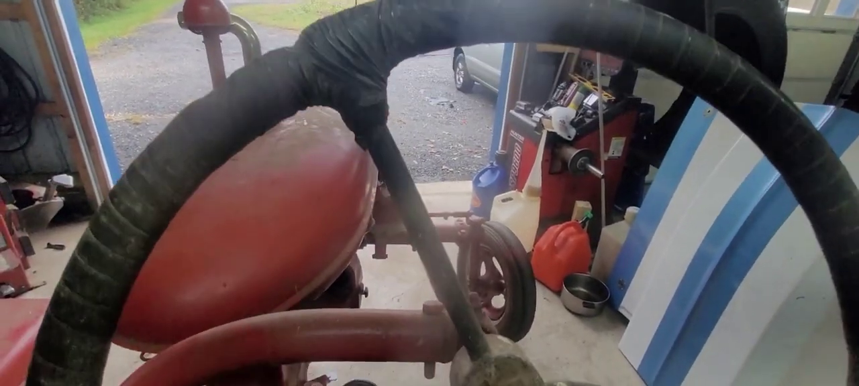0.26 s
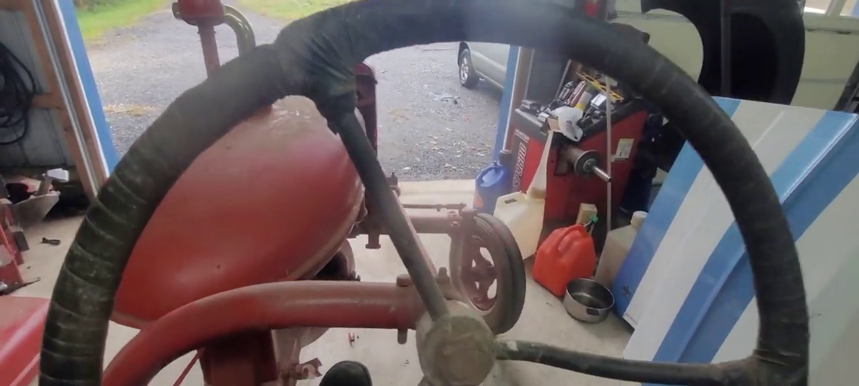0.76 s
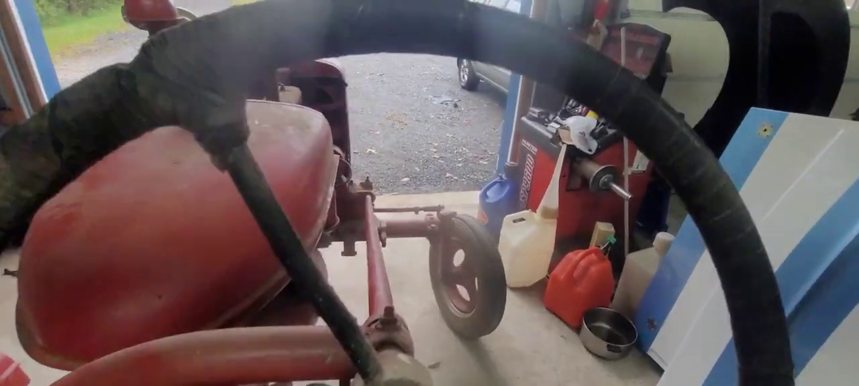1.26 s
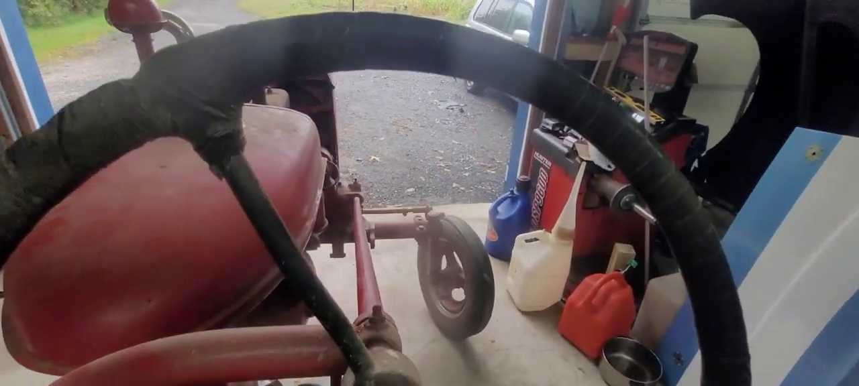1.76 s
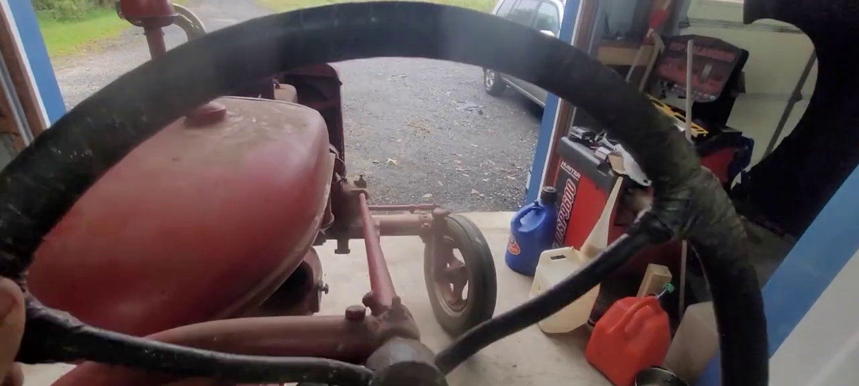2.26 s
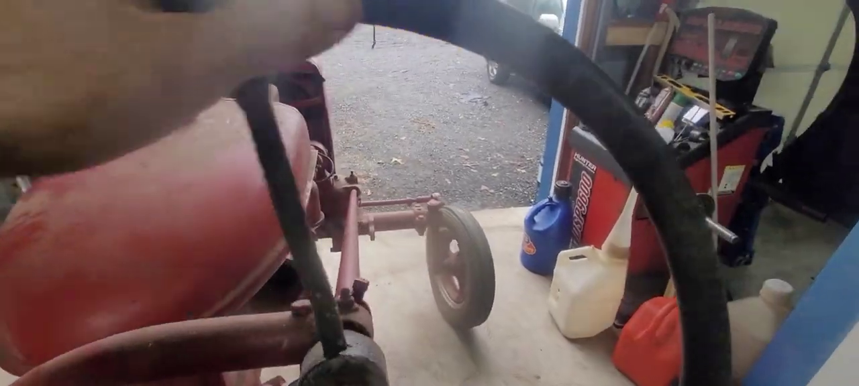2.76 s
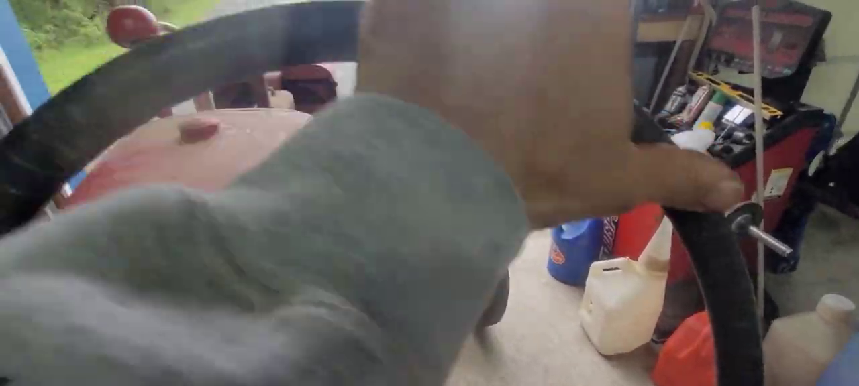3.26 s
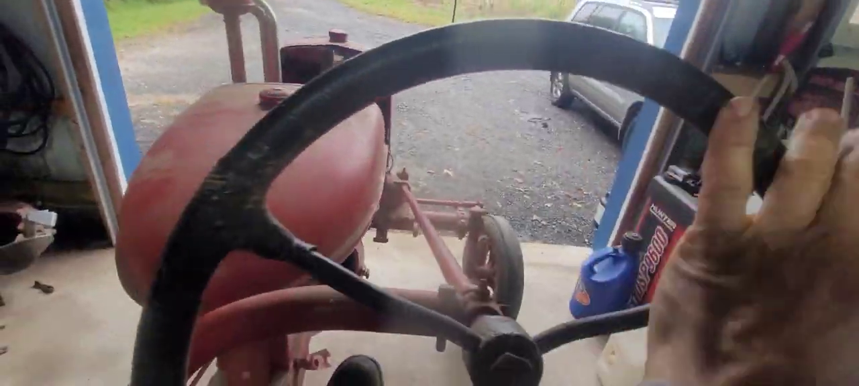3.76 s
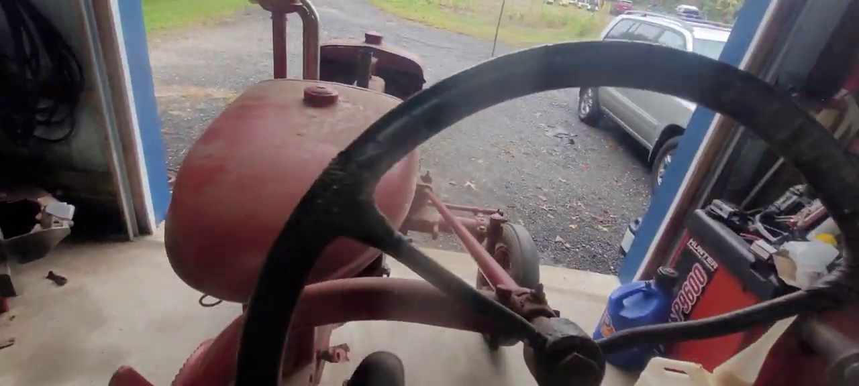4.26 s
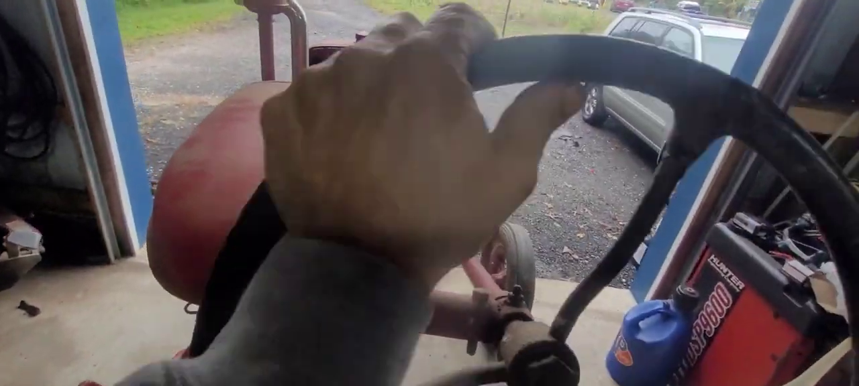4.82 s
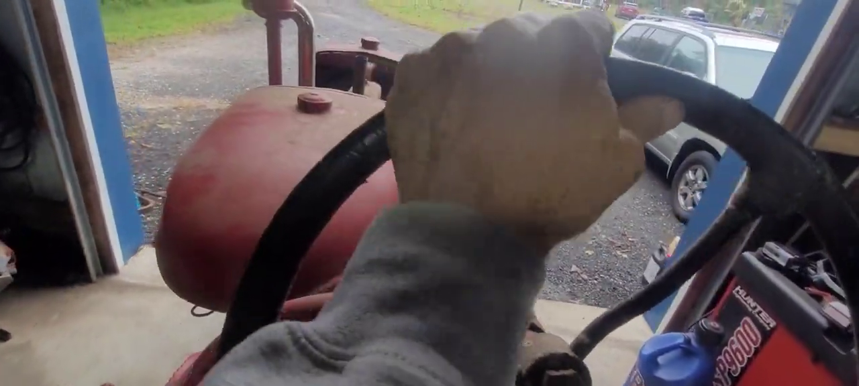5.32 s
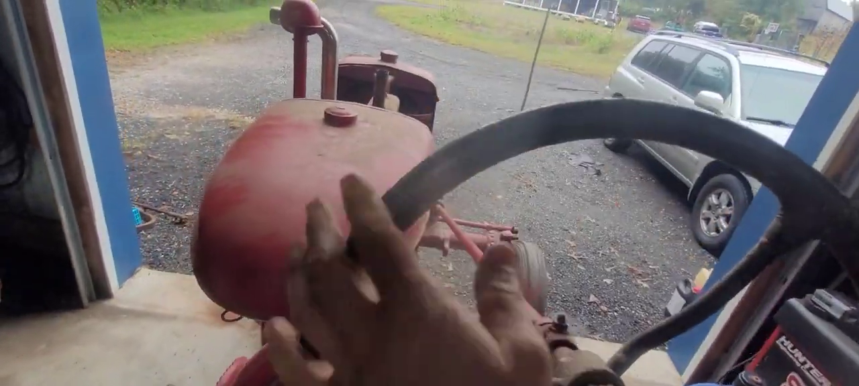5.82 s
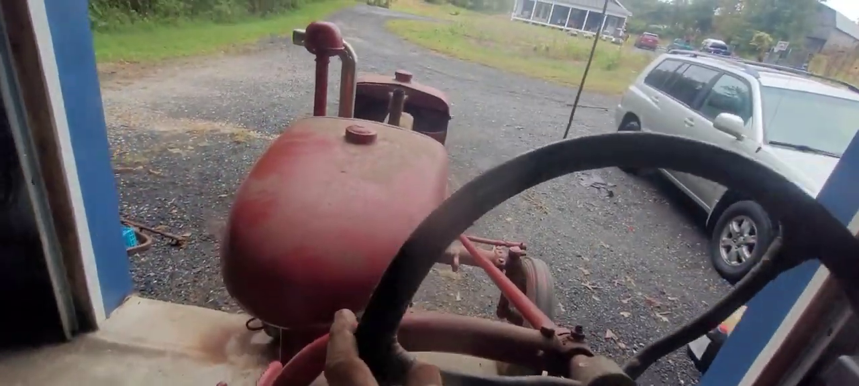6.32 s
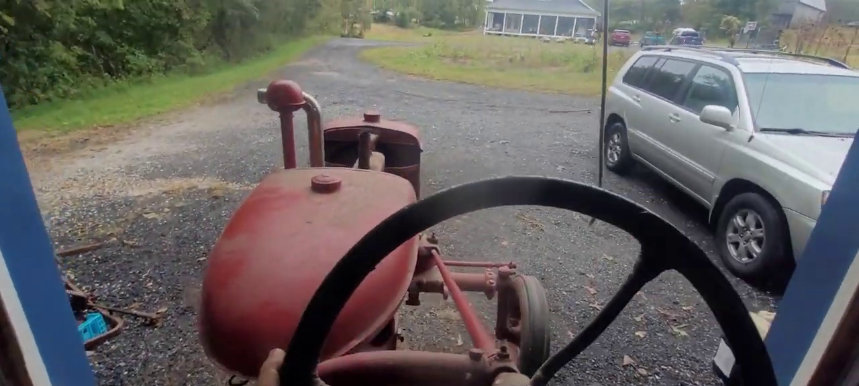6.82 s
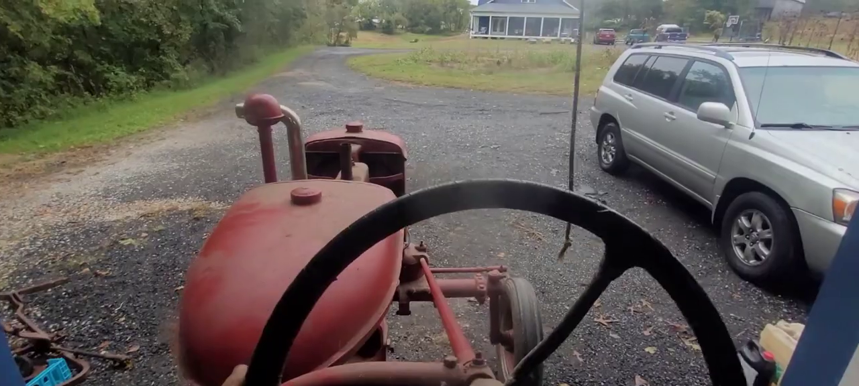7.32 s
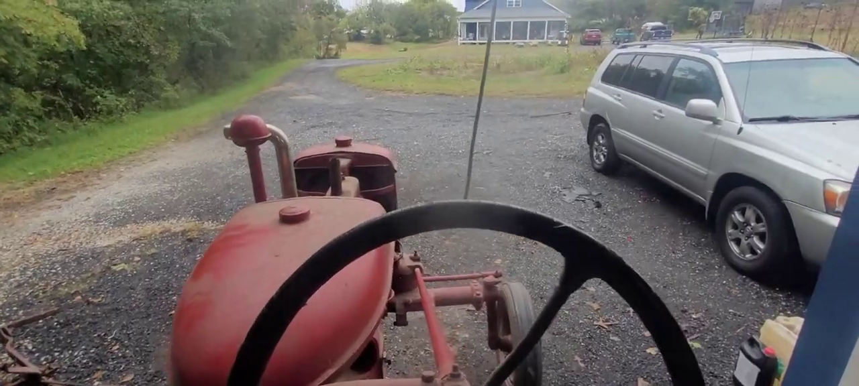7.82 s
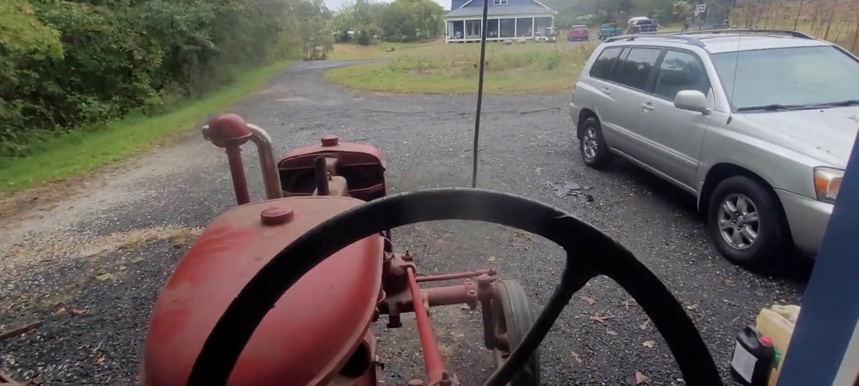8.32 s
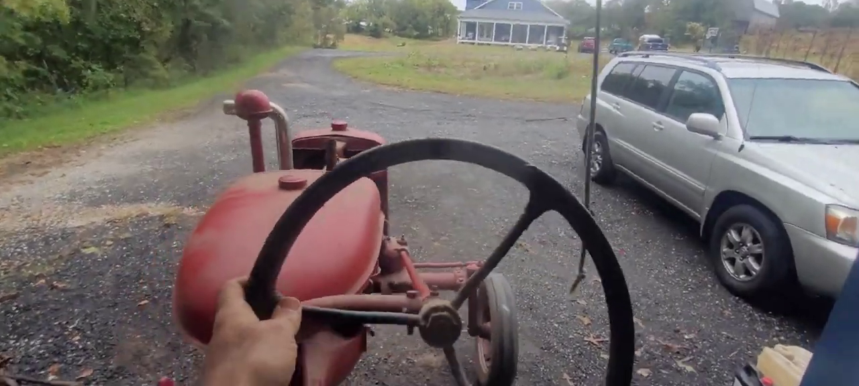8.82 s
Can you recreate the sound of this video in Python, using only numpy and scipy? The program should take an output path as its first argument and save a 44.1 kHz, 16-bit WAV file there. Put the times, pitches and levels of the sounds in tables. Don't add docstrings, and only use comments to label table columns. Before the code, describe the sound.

From the driver's seat, a low throbbing tractor exhaust with ticking valves and metallic knocks rolls along, ending in a burst of rattling and bogging.

```python
import sys
import numpy as np
from scipy import signal
from scipy.fft import rfft, irfft, next_fast_len
from scipy.io import wavfile
from scipy.ndimage import uniform_filter1d

SR = 44100
rng = np.random.default_rng(int(sys.argv[2]) if len(sys.argv) > 2 else 0)


def invert_db(x):
    u = np.asarray(x, float) / 20
    return 10 ** u


def file_out(sig):
    cols = np.atleast_2d(sig).T
    lim = np.clip(cols, -1, 1)
    pcm = np.round(lim * 32767).astype(np.int16)
    wavfile.write(sys.argv[1], SR, pcm)


N = 400428
T = np.arange(N) / SR
FAST = next_fast_len(N)
HZ = np.fft.rfftfreq(FAST, 1 / SR)
LUG_DB = 1.2

# [t/s, speed/(turns/s)]
SPEED = [(0.0, 20.229), (0.34, 20.014), (0.9, 18.169), (1.39, 19.231), (2.24, 20.225), (3.09, 19.931),
         (3.43, 20.104), (3.94, 19.67), (4.62, 19.784), (4.96, 19.423), (5.64, 19.688), (6.15, 20.097),
         (7.17, 20.289), (7.85, 19.665), (8.36, 19.945), (8.65, 19.399), (8.92, 17.269), (9.08, 18.176)]
# [t/s, load/dB]
LOAD = [(0, 1), (.78, 1), (1.11, 2.5), (1.67, 3.5), (1.95, .5), (3.16, -1), (4.45, 0), (5.79, 0), (6.15, 1),
        (6.55, .5), (7.18, -0.5), (7.74, 1.5), (8.02, 3.5), (8.42, 3), (8.72, 3), (8.88, 4.5), (9.0, 6.5),
        (9.08, 4.5)]
# [t/s, order 6 boom level/dB, order 7 uneven firing level/dB]
PIPE = [(0, -12, -30), (.45, -11.5, -25), (.625, -15, -18), (.655, -33, -25), (.9, -42, -23.5),
        (1.22, -18.5, -18), (1.73, -9, -17), (2.2, -11, -22), (4.75, -11, -20.5), (5.25, -14.5, -23.5),
        (6.05, -10.5, -22), (6.9, -14.5, -27), (7.62, -14, -27.5), (7.85, -21, -26), (8.36, -10.5, -21),
        (8.6, -17, -24.5), (8.83, -35, -27.5), (9.08, -24, -18.5)]
# [order, index of main order (0: 4, 1: 6, 3: 11), offset/dB]
ORDER_RIDERS = [(2, 0, -30), (3, 0, -25), (5, 1, -31), (9, 0, -18.5), (10, 3, -13.5), (12, 3, -6),
                (13, 0, -18), (15, 0, -14), (16, 0, -17), (18, 3, -14.5), (22, 3, -16.5), (24, 3, -16.5),
                (25, 3, -19.5), (30, 3, -12), (31, 3, -15.5), (32, 3, -15)]
ORDER_LAG = {4: .1, 5: .74, 6: .32, 7: .35, 8: .62, 11: .85}
# [t/s, width/s,
# level/dB]
ORDER_11_DIPS = [(.1, 0.23, -3.5), (.55, 0.091, -1), (1.35, 0.12, -4), (2.42, 0.19, -4), (4.15, .3, -5),
                 (5.3, 0.51, -5), (6.0, 0.35, -4), (7.0, 0.23, -14.5), (7.6, .25, -4), (1.5, .04, -10),
                 (3.87, 0.044, -14), (4.87, 0.046, -12), (8.1, 0.37, 2), (8.75, .12, -3)]
# [t/s, boom lost/0-1, recovery/s, thump level/dB]
MISFIRES = [(.515, 0.6, .025, -26), (.58, .6, 0.018, -26), (.63, 0.8, 0.026, -32), (1.41, 0.1, 0.013, -30),
            (1.49, 0.85, 0.037, -25), (1.58, 0, 0.012, -30), (2.62, 0.4, 0.027, -17), (2.99, 0, 0.013, -28),
            (3.82, 0.3, 0.054, -22), (4.841, 0.44, 0.099, -17), (5.19, 0, .03, -28),
            (6.44, 0.4, 0.035, -16), (7.27, 0.5, 0.036, -21), (7.54, 0.64, 0.042, -20),
            (7.73, 0.2, 0.029, -15), (8.42, 0.1, .03, -13), (8.51, .8, 0.014, -24), (8.62, .4, 0.03, -23),
            (8.635, 0.7, 0.036, -30), (8.46, .5, .02, -30), (8.56, .5, .015, -30), (8.72, .2, .03, -19),
            (8.86, 0.2, .03, -24)]
CRANK_JOLTS = [1.49, 2.62, 3.82, 4.84, 6.44, 7.27, 7.54, 7.73, 8.42]
VALVE_TICKS = [(.19, 1.3), (.69, .7), (.86, .5), (1.19, .6), (1.65, .7), (1.86, .6)]
# [f/Hz, level/dB per Hz]
RUMBLE_SPECTRUM = [(20, -34), (45, -8.5), (100, -4), (150, 4), (190, -2.5), (260, -2.5), (310, -1),
                   (380, -7.5), (490, -4), (545, -5.5), (605, -2), (720, -14), (850, -11), (1100, -49)]
BLOCK_SPECTRUM = [(410, -32), (700, 0.5), (792, -6), (1000, -0.5), (1260, -3.5), (1670, -4), (2000, -7),
                  (2150, -5.5), (2730, -12), (3300, -15), (4290, -19), (7260, -120)]
FIZZ_SPECTRUM = [(1590, -12.5), (2700, -7.5), (4170, -0.5), (4600, -2), (5760, -1), (6210, 0.5), (6940, -4),
                 (7650, -2), (8310, -12.5), (8890, -11.5), (11800, -3), (14800, 0.5), (15500, -1),
                 (16200, -15)]
# [f/Hz, width/Hz, level/dB]
CASTINGS = [(491, 40, 3), (602, 40, 6), (965, 58, 5.5), (1172, 48, -0.5), (1690, 65, 2.5), (2135, 56, -0.5),
            (2474, 35, -1.5), (3140, 90, -9), (3760, 46, -5), (4260, 60, -10), (5350, 85, -6),
            (6130, 140, -11), (7360, 170, -10.5)]
# [t/s, peak level/dB, low share/dB]
KNOCKS = [(0.9083, -25.5, -9), (1.105, -23, -4), (1.5703, -22, -6), (1.672, -24, -2), (1.8745, -24, -4),
          (2.3474, -19.5, -14), (3.5446, -25, -13), (3.899, -22, -6), (4.153, -22.5, -3), (5.1975, -23, -4),
          (5.5797, -27, -11), (5.7084, -24, -12), (6.1075, -28, -2), (6.1305, -27, 1), (6.4053, -29, 0),
          (6.5301, -19, -6), (6.568, -17, -13), (6.6787, -26, -9), (6.8034, -25, -4), (0.6908, -28, -10),
          (0.7991, -29, -6), (1.0186, -26, -12), (4.4568, -30, -8), (4.6169, -27, -10), (5.0684, -26, -6),
          (5.1198, -29, -6), (7.8015, -32, 8), (7.8228, -31, 7), (8.2038, -23.5, 5.5), (8.303, -29, 6),
          (8.507, -21, 1), (8.806, -25, 0)]
# [t/s, peak level/dB, ringing f/Hz]
BUMPS = [(0.103, -17, 593), (0.403, -14, 577), (0.511, -10, 576), (1.364, -19, 470), (1.493, -27, 353),
         (1.874, -16, 587), (2.772, -20, 576), (3.471, -28, 378), (4.262, -12.5, 353), (5.199, -14, 480),
         (6.107, -19, 587), (6.404, -16, 355), (6.733, -23, 517), (7.194, -22, 576), (7.442, -20, 711),
         (8.0, -30, 592), (8.101, -22, 580), (8.302, -15, 500), (8.431, -16, 510), (8.507, -10.5, 490),
         (8.552, -24, 358), (8.673, -18, 421), (8.806, -14, 960), (8.876, -10.5, 700), (8.907, -15, 384),
         (8.965, -19, 486)]
# [t/s, peak level/dB, low share/dB]
SLACK = [(6.9253, -21, -12), (7.0734, -19, -16), (7.1967, -23, -10), (7.246, -26, -8), (7.3204, -21, -7),
         (7.3703, -16, -12), (7.47, -21, -9), (7.5698, -31, -3), (7.6207, -19, -12), (7.6716, -20, -11),
         (7.7709, -27, -5), (7.8013, -26, -8), (7.8227, -18, -7), (7.8736, -23, -8), (7.8996, -23, -6),
         (7.9754, -14, -14), (8.1764, -23, -5), (8.2767, -22, -9), (8.3031, -25, -4), (8.378, -16, -14),
         (8.4802, -24, -8), (8.5057, -18, -8), (8.5815, -19, -12), (8.6084, -21, -9)]
# [t/s, peak level/dB, low share/dB, ringing f/Hz]
SILL_RATTLE = [(8.7222, -23, -2, 3550), (8.7536, -21, -5, 2520), (8.784, -24, -7, 3770),
               (8.815, -14.5, -14, 5920), (8.8459, -13, -10, 2500), (8.8748, -11.5, -12, 4280),
               (8.9053, -10, -9, 3770), (8.9317, -13, -9, 6540), (8.9616, -8, -13, 3790),
               (8.9891, -10, -8, 4390), (9.018, -10, -12, 3780), (9.0439, -10.5, -11, 6100),
               (9.0724, -12, -11, 3810)]
# [t/s, peak level/dB, f/Hz]
TAPPET_PINGS = [(4.3392, -31, 11900), (4.457, -26, 12100), (4.5842, -31, 12100), (4.6585, -34, 12300),
                (4.7867, -30, 12100), (4.9159, -32, 12800), (5.0686, -29, 12000), (5.12, -30, 12200),
                (5.1968, -31, 11800), (5.2751, -32, 13500), (5.4268, -31, 11600), (5.4787, -32, 12100),
                (5.5046, -34, 11800), (5.5809, -30, 13100), (5.7081, -33, 12400), (5.8089, -30, 12300),
                (5.8817, -33, 12600), (5.9087, -31, 12500), (5.982, -33, 13100), (6.0823, -29, 12900),
                (6.1072, -23, 12400), (6.1317, -28, 12700), (6.1806, -31, 13400), (6.2065, -30, 12100),
                (6.2314, -33, 12800), (6.2803, -32, 12900), (6.3058, -29, 12100), (6.4055, -30, 12500),
                (6.5298, -26, 13000), (6.5687, -17, 12200), (6.6799, -30, 12600), (6.7777, -33, 13000),
                (6.8026, -30, 11700), (6.9264, -30, 12900)]
# [t/s, level/dB, f/Hz, length/s]
SQUEAKS = [(.8, -36.5, 2140, 0.12), (1.107, -28, 2460, .03), (1.108, -32, 3100, .033),
           (1.1, -33, 1710, 0.05), (1.571, -34, 2100, .03), (2.971, -35.5, 2500, .077),
           (2.971, -37, 2130, .05), (5.19, -32, 1650, .05), (6.568, -31, 12200, .025),
           (6.59, -33, 13790, .012), (7.819, -25, 1890, 0.022)]
# [t/s, level/dB, f/Hz, width/Hz, length/s]
ROUGH_TONES = [(1.015, -34, 5000, 400, 0.044), (1.568, -24.5, 3870, 850, 0.045), (1.627, -29, 3900, 600, .035),
               (1.672, -26.5, 4000, 1500, .05), (1.672, -28, 2500, 220, 0.06), (3.55, -32.5, 6540, 300, 0.027),
               (3.897, -31, 6400, 2200, 0.078), (6.405, -27, 1450, 700, .025), (6.109, -25.5, 1200, 900, .06),
               (6.53, -25, 6800, 600, 0.006), (6.567, -18, 12500, 3000, 0.0063), (6.57, -27, 11500, 2500, 0.03),
               (1.55, -34.5, 7500, 700, .07), (1.72, -32, 4250, 150, .02), (8.507, -30, 2180, 220, 0.046),
               (8.51, -30, 3800, 400, 0.061), (8.677, -28, 270, 29, 0.13), (8.777, -32, 280, 30, 0.084),
               (8.68, -19.5, 125, 3, 0.12), (8.87, -21.5, 160, 9.9, 0.094), (8.97, -21, 145, 8.9, .1),
               (8.82, -20.5, 112, 14, .07), (3.98, -33, 300, 40, .13), (8.65, -27, 1100, 1800, 0.16),
               (8.672, -23, 800, 900, .03), (8.715, -21, 900, 1000, .02), (8.745, -27, 1900, 1200, .03),
               (5.95, -31, 1200, 1300, .17), (5.197, -31, 4300, 500, .03), (5.197, -31, 2500, 400, .03),
               (8.66, -23.5, 450, 650, .12), (8.962, -21, 4100, 1300, 0.033)]
# [f/Hz, likeness/0-1, left lead/rad]
PORT_LIKENESS = [(25, 0.7, 2), (99, 1, 1.1), (280, 0.97, 0.13), (470, 0.82, 1.13), (820, 0.57, 1.18),
                 (1250, 0.44, 2.5), (1630, 0.17, 2.8), (2100, 0.04, 3.2), (5000, 0.04, 1.2)]
# [f/Hz, left minus right level/dB]
PORT_TILT = [(60, -1.5), (110, -3), (200, 0.5), (380, -1.5), (700, 0.5), (1290, -4.5), (2380, -0.5),
             (4400, 0.5), (8120, 1), (12000, 4), (15000, 3.5)]


def crank():
    return np.cumsum(np.interp(T, *np.transpose(SPEED))) / SR


def exhaust(turns):
    kept_log, thump = misfires()
    mono = np.sqrt(2) * boom_orders(turns) * np.exp(kept_log) + thump
    late_left = np.roll(mono, shift=8)
    return np.array([late_left, mono]) * invert_db([[-.7], [.7]])


def boom_orders(turns):
    decimation = 16
    t, turns = T[::decimation], turns[::decimation]
    level_db = order_levels(t)
    jolt_s, lurch_turns, order_4_lurch_turns = .03, .015, .33
    jolt = dips(t, [(s, jolt_s, 1) for s in CRANK_JOLTS])
    turns = turns + lurch_turns * jolt
    boom = np.zeros(len(t))
    for order, db in zip((4, 6, 7, 11, 8), level_db):
        phase = order * turns - ORDER_LAG[order]
        if order == 4:
            phase = phase + order_4_lurch_turns * jolt
        boom += invert_db(db) * np.cos(2 * np.pi * phase)
    for order, main, offset_db in ORDER_RIDERS:
        order = round(order)
        wobble = 0.0031 * order * drift(6, t)
        phase = order * turns + wobble - ORDER_LAG.get(order, rng.random())
        boom += invert_db(level_db[round(main)] + offset_db + 1.8 * drift(5, t)) * np.cos(2 * np.pi * phase)
    flutter_db = (0.4 + 0.2 * lug(t)) * drift(25, t)
    return signal.resample_poly(boom * invert_db(flutter_db), decimation, 1)[:N]


def order_levels(t):
    s, boom_db, uneven_db = np.transpose(PIPE)
    boom_db, uneven_db = np.interp(t, s, boom_db), np.interp(t, s, uneven_db)
    bog_db = dips(t, [(8.84, 0.16, -13)])
    fourth_db = -32 + 1.7 * load(t) + LUG_DB * lug(t) + bog_db
    full_boom_db = -11
    eleventh_db = -33 + 0.14 * (boom_db - full_boom_db) + dips(t, ORDER_11_DIPS)
    eighth_db = -35.5 + 1.3 * load(t)
    return fourth_db, boom_db, uneven_db, eleventh_db, eighth_db


def misfires():
    kept_log, thump, t = np.zeros(N), np.zeros(N), T[:SR // 4]
    for s, lost, recovery_s, thump_db in MISFIRES:
        sag = (1 - np.exp(-(t / 0.0086) ** 2)) * np.exp(-(t / recovery_s) ** 2)
        add(kept_log, s, np.log(1 - np.clip(lost, 0, .97) * sag))
        swell = t / 0.0097 * np.exp(1 - t / 0.0067)
        add(thump, s, invert_db(thump_db - 8.0) * np.sin(2 * np.pi * 70 * t) * swell)
    return kept_log, thump


def load(t):
    return np.interp(t, *np.transpose(LOAD))


def lug(t):
    governed_tps, most_tps = 19.76, 1.3
    return np.clip(governed_tps - np.interp(t, *np.transpose(SPEED)), 0, most_tps)


def dips(t, rows):
    return sum(depth * np.exp(-((t - s) / width_s) ** 2) for s, width_s, depth in rows)


def drift(top_hz, times):
    t = T[::256]
    slow = np.zeros(len(t))
    for f in np.geomspace(top_hz / 20, top_hz, num=20):
        slow += np.sin(2 * np.pi * (f * t + rng.random())) / np.sqrt(f)
    return np.interp(times, t, evened(slow))


def clatter(turns):
    ticks = valve_ticks(turns)
    rumble = ports(np.sqrt(1 + 0.35 * ticks), invert_db(read(RUMBLE_SPECTRUM, HZ)))
    block = ports(np.sqrt(1 + 0.68 * ticks), invert_db(read(BLOCK_SPECTRUM, HZ)))
    fizz = ports(np.sqrt(1 + 2.1 * ticks), invert_db(read(FIZZ_SPECTRUM, HZ)))
    ringing = ports(np.sqrt(0.2 + ticks), castings())
    rumble_db = -31.6 + 0.97 * load(T) + LUG_DB * lug(T)
    block_db = -33.5 + load(T)
    walls_db = -0.27 * T
    fizz_db = -34 + 1.25 * load(T) + walls_db
    mix = invert_db(rumble_db) * patchy(rumble, 1.2)
    mix += invert_db(block_db) * patchy(block + invert_db(-8.5) * ringing, 1.4)
    return mix + invert_db(fizz_db) * patchy(fizz, 2.15)


def valve_ticks(turns):
    train = np.zeros(N)
    for at, strength in VALVE_TICKS:
        hits = np.flatnonzero(np.diff(np.floor((turns - at) / 2)))
        jitter, size = rng.standard_normal((2, len(hits)))
        hits = np.clip(hits + (40 * jitter).astype(int), 0, N - 1)
        train[hits] += strength * invert_db(3.3 * size)
    strays_per_s = 4
    stray = (rng.random(N) < strays_per_s / SR) * invert_db(4.4 * rng.exponential(1, N)) * 0.3
    return signal.oaconvolve(train + stray, np.exp(-T[:2000] / 0.0088))[:N]


def castings():
    return sum(invert_db(db) / (1 + (2 * (HZ - hz) / width_hz) ** 2) for hz, width_hz, db in CASTINGS)


def ports(envelope, colour):
    a, b = rfft(rng.standard_normal((2, N)) * envelope, FAST)
    f, likeness, lead_rad = np.transpose(PORT_LIKENESS)
    same = np.clip(np.interp(HZ, f, likeness), 0, 1)
    shared = same * a * np.exp(-1j * np.interp(HZ, f, lead_rad))
    pair = np.array([a, shared + np.sqrt(1 - same ** 2) * b])
    pair *= colour * invert_db(np.array([[.5], [-.5]]) * read(PORT_TILT, HZ))
    return evened(irfft(pair, FAST)[:, :N])


def patchy(x, patch_db):
    z = signal.stft(x.astype(np.float32), nperseg=512)[2]
    field = rng.standard_normal(z.shape[1:])
    field = uniform_filter1d(field, size=4, axis=0)
    field = evened(uniform_filter1d(field, size=8, axis=1))
    return evened(signal.istft(z * invert_db(patch_db * field), nperseg=512)[1][:, :N])


def chassis():
    bright, dull, rung = np.zeros(N), np.zeros(N), np.zeros((2, N))
    knocks(bright, dull)
    bumps(dull, rung)
    loose_strikes(bright, dull, rung)
    tappet_pings(rung)
    for s, db, hz, length_s in SQUEAKS:
        add(rung, s, rough_tone(db, hz, 150, length_s))
    for s, db, hz, width_hz, length_s in ROUGH_TONES:
        add(rung, s, rough_tone(db, hz, width_hz, length_s))
    bright_noise = patchy(ports(1, invert_db(read(FIZZ_SPECTRUM, HZ))), 3.2)
    dull_noise = ports(1, invert_db(read(BLOCK_SPECTRUM, HZ)) + castings())
    return bright * bright_noise + dull * dull_noise + rung


def knocks(bright, dull):
    t = T[:SR // 6]
    decay = .6 * np.exp(-t / .0015) + .7 * np.exp(-t / .009) + .16 * np.exp(-t / .03)
    shape = (1 - np.exp(-t / .0005)) * decay
    for s, db, low_db in KNOCKS:
        add(bright, s, invert_db(db - 5.5) * shape)
        add(dull, s, invert_db(db + low_db - 4.0) * shape)


def bumps(dull, rung):
    t = T[:SR // 6]
    shape = (1 - np.exp(-t / 0.00081)) * np.exp(-t / 0.016)
    for s, db, hz in BUMPS:
        add(dull, s, invert_db(db - 19.5) * np.exp(-t / 0.034))
        tone = np.sin(2 * np.pi * (hz * t + 0.11 * rng.random((2, 1))))
        add(rung, s, invert_db(db - 11.0) * shape * tone)


def loose_strikes(bright, dull, rung):
    t = T[:SR // 10]
    shape = (1 - np.exp(-(t / 0.00098) ** 2)) * (np.exp(-t / 0.0051) + 0.15 * np.exp(-t / 0.034))
    for s, db, low_db in SLACK:
        add(bright, s, invert_db(db - 7.0) * shape)
        add(dull, s, invert_db(db + low_db - 12.0) * shape)
    for s, db, low_db, hz in SILL_RATTLE:
        add(bright, s, invert_db(db - 6.0) * shape)
        add(dull, s, invert_db(db + low_db - 1.0) * shape)
        add(rung, s, rough_tone(db - 10.5, hz, 600, 0.012))
        plate_hz = 1300 * rng.uniform(.8, 1.3)
        add(rung, s, rough_tone(db + low_db - 1, plate_hz, 900, .018))


def tappet_pings(rung):
    t = T[:SR // 10]
    shape = (1 - np.exp(-t / .0003)) * np.exp(-t / .0015)
    for s, db, hz in TAPPET_PINGS:
        tone = np.sin(2 * np.pi * (hz * t + rng.random((2, 1))))
        add(rung, s, invert_db(db + 4.0) * invert_db([[1.5], [-1.5]]) * shape * tone)


def rough_tone(db, hz, width_hz, length_s):
    t = T[:round(1.5 * length_s * SR)]
    noise = rng.standard_normal((2, len(t), 2)) @ [1, 1j]
    pole = np.exp(-np.pi * width_hz / SR)
    waver = signal.lfilter([1], np.poly([pole, pole]), noise)
    steady = min(30 / width_hz, 1.5)
    waver = steady + waver / np.sqrt(np.mean(abs(waver) ** 2))
    shape = (1 - np.exp(-t / 0.0013)) * np.exp(-(t / length_s) ** 2)
    return invert_db(db) * shape * (waver * np.exp(2j * np.pi * hz * t)).real


def evened(x):
    return x / np.sqrt(np.mean(x ** 2) + 1e-20)


def read(points, hz):
    f, value = np.transpose(points)
    return np.interp(np.log(hz + 1), np.log(f + 1), value)


def add(mix, s, sound):
    part = mix[..., round(s * SR):][..., :sound.shape[-1]]
    part += sound[..., :part.shape[-1]]


def scene():
    turns = crank()
    return exhaust(turns) + clatter(turns) + chassis()


def top_cut(x):
    return signal.sosfilt(signal.butter(12, 17000, fs=SR, output="sos"), x)


def record(dry):
    limited = 1.65 * np.tanh(dry / 1.58)
    edge_hz = 15950
    edge = signal.firwin(301, edge_hz, window=("kaiser", 9), fs=SR)
    mix = signal.oaconvolve(limited, edge[None], "same")
    return top_cut(mix)


dry = scene()
out = record(dry)
file_out(out)
```